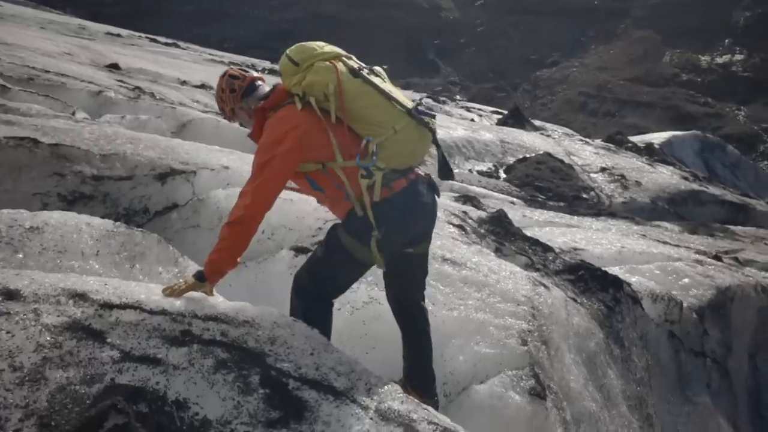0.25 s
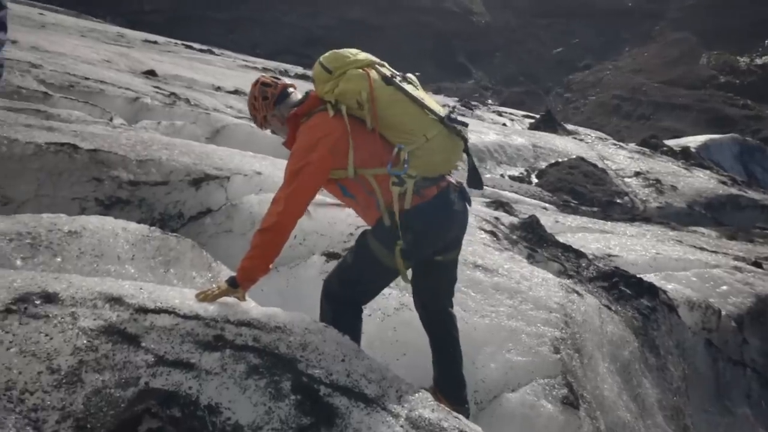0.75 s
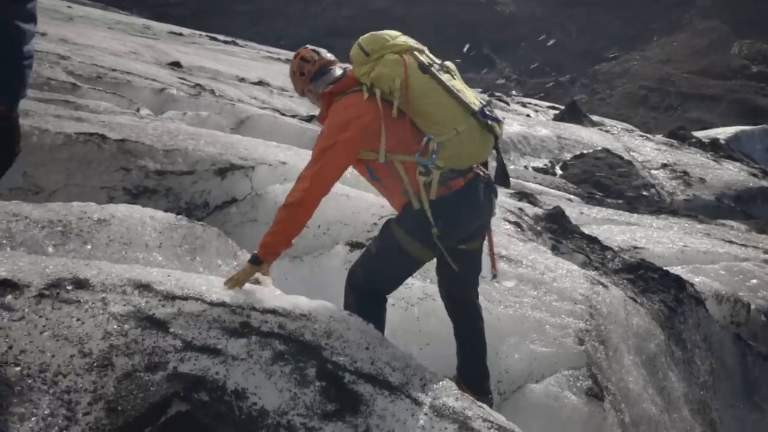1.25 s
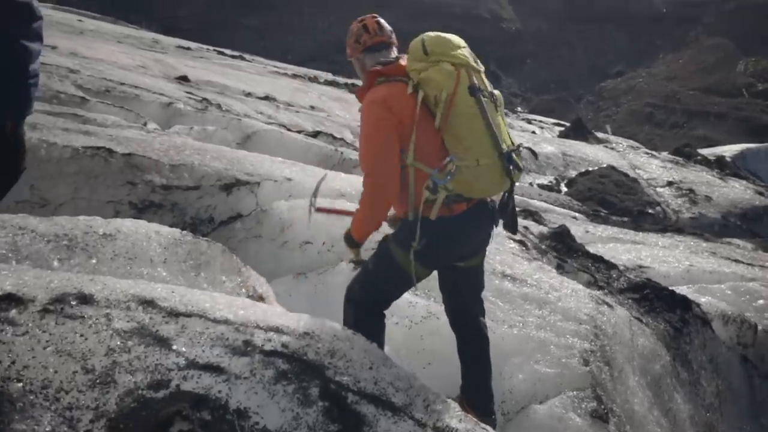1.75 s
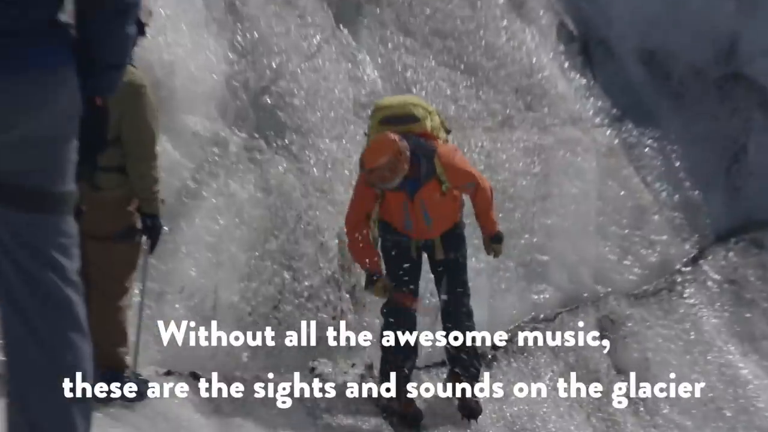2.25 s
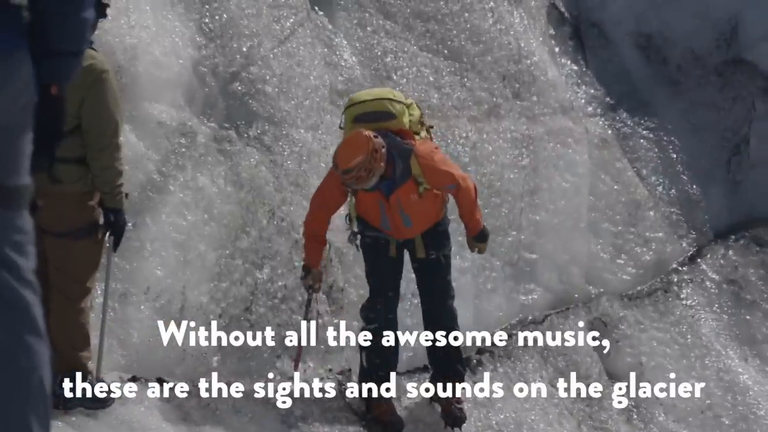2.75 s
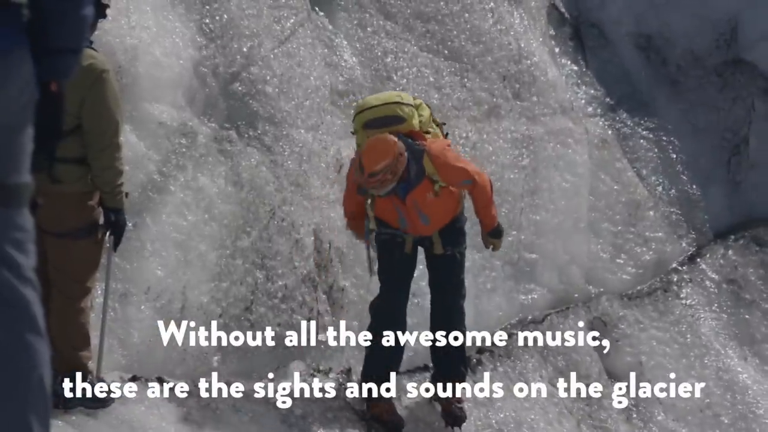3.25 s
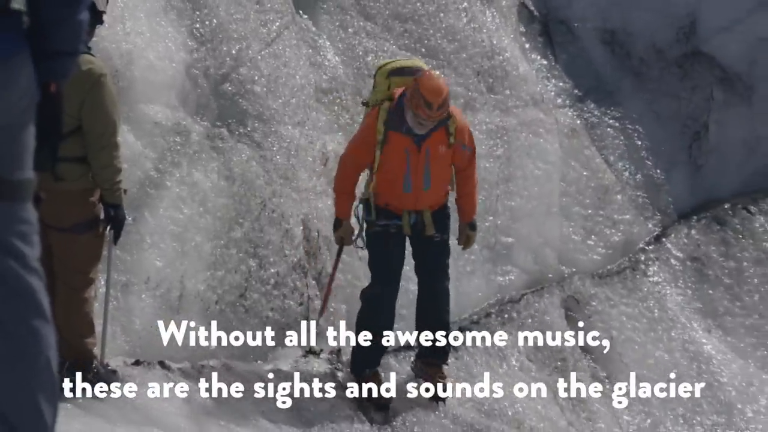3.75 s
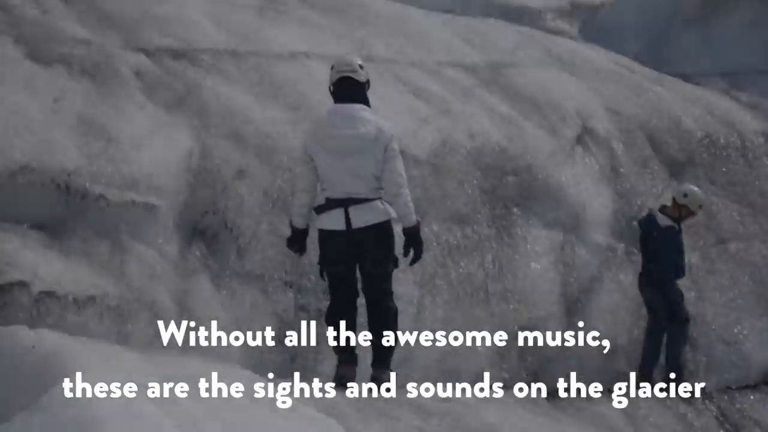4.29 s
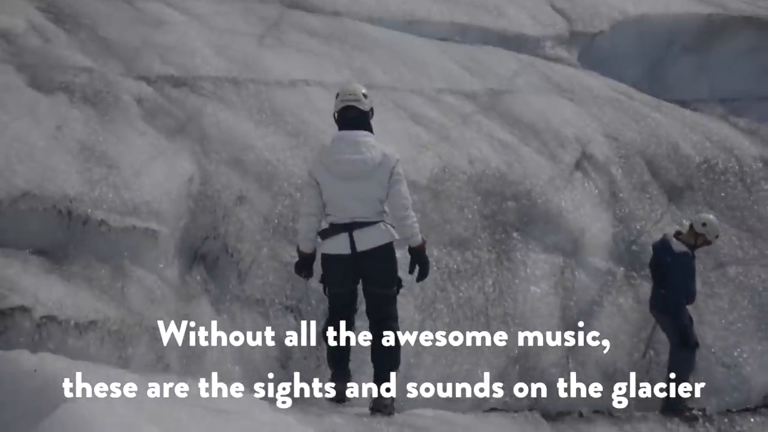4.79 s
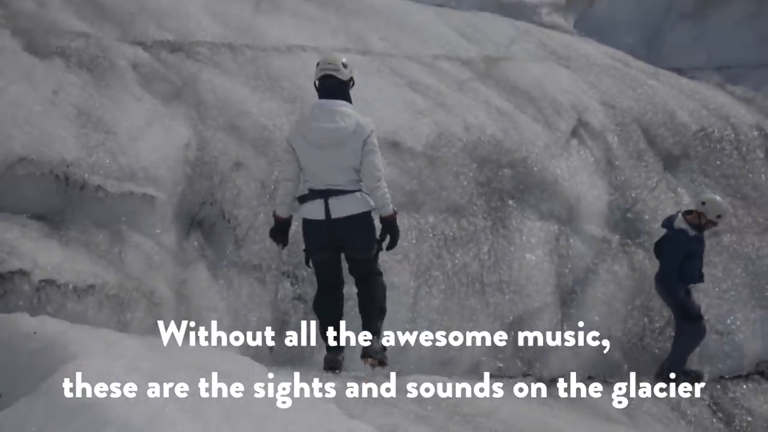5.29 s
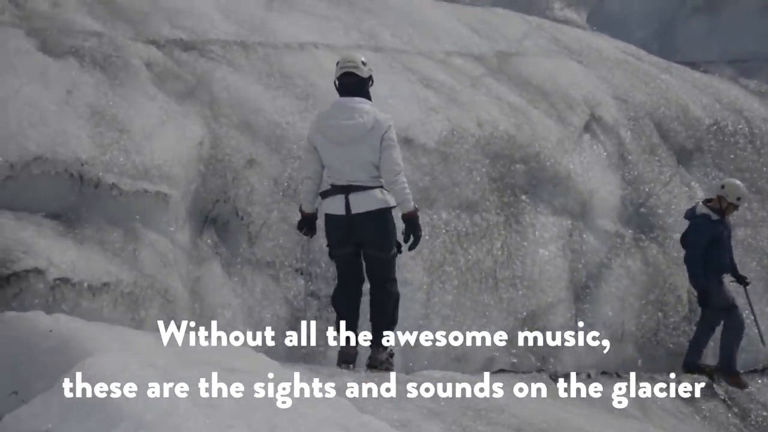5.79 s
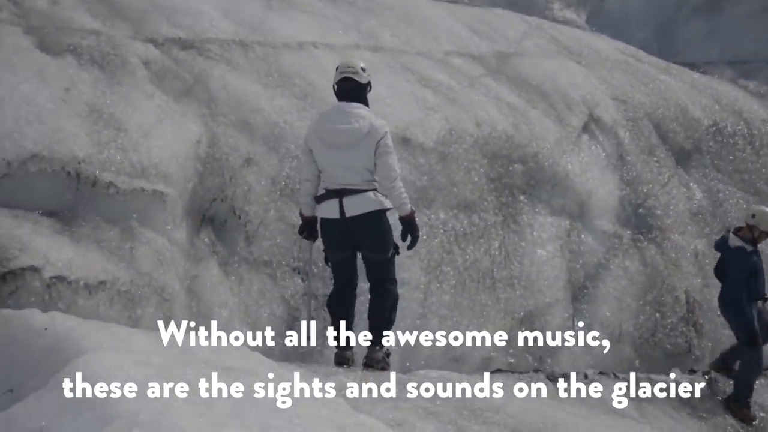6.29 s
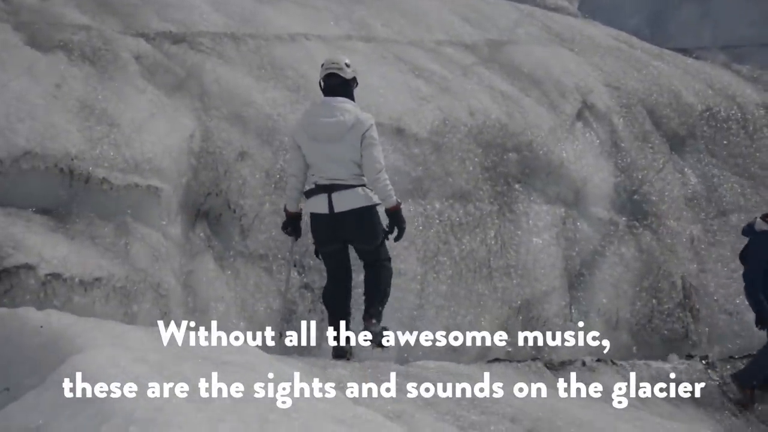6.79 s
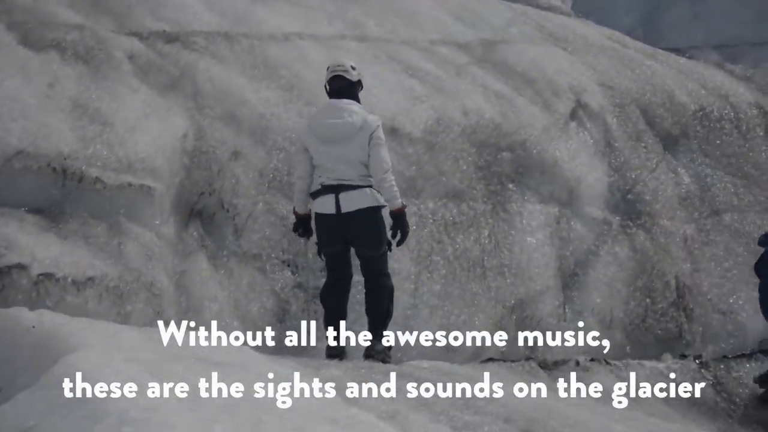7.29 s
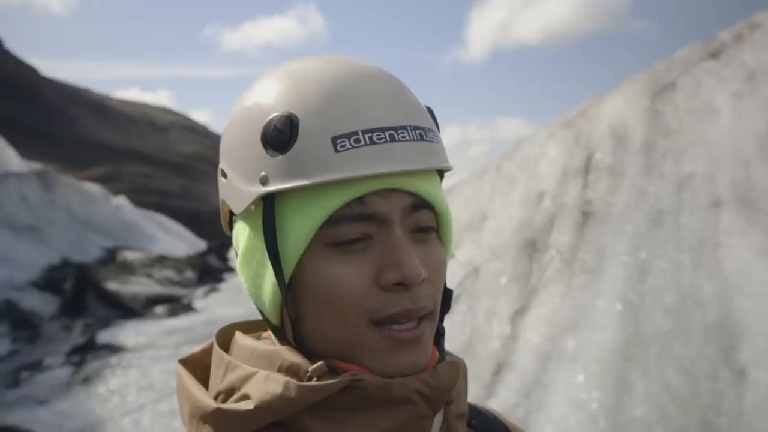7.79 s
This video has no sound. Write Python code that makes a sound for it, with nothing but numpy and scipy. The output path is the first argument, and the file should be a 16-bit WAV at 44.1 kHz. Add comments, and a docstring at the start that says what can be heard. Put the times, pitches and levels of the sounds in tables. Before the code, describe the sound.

Five crisp ice axe blows come first, the middle ones strongest, each cracking and chattering with short ringing and a sprinkle of ice. Then five softer, duller blows follow at an even pace, mixed with many short gritty crampon steps. Throughout, gusts thump an exposed microphone over a low roar, airy rush and faint gritty hiss. The place is open and dry, without echo.

```python
"""An ice axe bites into glacier ice: cracking ice, knock, pick chatter, ringing steel modes, falling spray.
From four seconds on the blows are muffled, as if farther off. Crampon steps crunch as bursts of fractures.
Bits of ice tick as short resonant noise; a few dry clicks are bare decaying pulses.
Behind them gusty wind buffets the microphone in a low rumble and a sliding roar of filtered noise,
over a rush of air and a hiss with gritty ice grains."""
import sys
import numpy as np
from scipy import signal
from scipy.fft import rfft, irfft, next_fast_len
from scipy.io import wavfile
from scipy.ndimage import uniform_filter1d

SR = 44100
rng = np.random.default_rng(int(sys.argv[2]) if len(sys.argv) > 2 else 0)


def put_to_file(sound):
    """Save the sound as 16-bit audio at rate SR, in the file named by the first command-line argument."""
    columns = np.atleast_2d(sound).T  # one column per channel
    safe = np.clip(columns, -1, 1)
    whole_steps = np.round(safe * 32767)
    wavfile.write(sys.argv[1], SR, whole_steps.astype(np.int16))


N = 354652


def from_db(db):
    """Decibels to amplitude gain."""
    return 10 ** (np.asarray(db) / 20)


def rms_one(x):
    """Scale to an rms of one."""
    return x / np.sqrt(np.mean(x ** 2) + 1e-20)


def in_time(rows):
    """Each column of a time curve, interpolated at every sample."""
    time_s, *columns = np.transpose(rows)
    return [np.interp(np.arange(N) / SR, time_s, column) for column in columns]


def add(track, start_s, sound):
    """Mix a sound into the track."""
    start = max(0, round(start_s * SR))
    track[start:start + len(sound)] += sound[:max(0, N - start)]


def coloured(x, spectrum):
    """Causal minimum-phase filter with the given spectrum shape; white noise keeps its level."""
    size = 2 * next_fast_len(len(x) // 2 + SR // 10)
    hz, db = np.transpose(spectrum)
    grid_hz = np.maximum(np.fft.rfftfreq(size, 1 / SR), 1)
    beyond = np.minimum(grid_hz / hz[0], 1) * np.minimum(hz[-1] / grid_hz, 1)
    shape_db = np.interp(np.log(grid_hz), np.log(hz), db)
    gain = rms_one(from_db(shape_db) * beyond ** 2)
    # folded cepstrum gives the minimum phase
    cepstrum = irfft(np.log(gain))[:size // 2]
    cepstrum[1:] *= 2
    response = np.exp(rfft(cepstrum, size))
    return irfft(rfft(x, size) * response, size)[:len(x)]


def resonance(x, hz, width_hz):
    """Two-pole resonance with gain one on top."""
    r = np.exp(-np.pi * width_hz / SR)
    numerator = np.array([1, 0, -1]) * (1 - r * r) / 2
    denominator = [1, -2 * r * np.cos(2 * np.pi * hz / SR), r * r]
    return signal.lfilter(numerator, denominator, x)


def low_pass(x, hz, order):
    """Butterworth low-pass, cutoff held below Nyquist."""
    return signal.sosfilt(signal.butter(order, min(hz, SR / 2 - 100), fs=SR, output="sos"), x)


def drift(rate_hz):
    """Smooth random curve with an rms of one: noise low-passed at rate_hz."""
    return rms_one(low_pass(rng.standard_normal(N + SR), rate_hz, order=2)[SR:])


def evened(x, span_s):
    """Noise brought to an rms near one, steady over spans longer than span_s."""
    power = uniform_filter1d(x ** 2, max(2, int(span_s * SR)))
    return x / np.sqrt(power + 1e-12)


def fractures(per_s, spread_db):
    """Tiny breaks at random moments, of uneven size and either sign; rms one."""
    size_db = spread_db * np.clip(rng.standard_normal(N), -2, 2)
    sizes = from_db(size_db) * rng.choice([-1, 1], N)
    return rms_one(sizes * (rng.random(N) < per_s / SR))


def load(t, peak_s):
    """Force on the ice: rises to one at peak_s, then collapses as the ice gives way."""
    u = t / peak_s
    return u * np.exp((1 - u * u) / 2)


def grit(per_s, low_hz, high_hz, spread_db, relative_width, count=18):
    """Grains of ice land at random; each rings briefly at one of count pitches; rms one."""
    landings, dealt = fractures(per_s, spread_db), rng.integers(0, count, N)
    out = np.zeros(N)
    for k, hz in enumerate(np.geomspace(low_hz, high_hz, count)):
        grains = landings * (dealt == k) + 1e-18
        once = resonance(grains, hz, relative_width * hz)
        out += resonance(once, hz, relative_width * hz) / np.sqrt(hz)
    return rms_one(out)


# axe blows: start_s, bite_s (rise to full force), crack_db, knock_hz, knock_db, chatter_db,
#            ring_db, pitch_ratio (set by the grip of the ice on the pick), crumble_db
AXE_BLOWS = [(0.476, 0.01, -20, 1610, -23.5, -19, -43, 1.012, -34),
             (1.02, 0.0082, -20, 1370, -23.5, -25, -26, 1.01, -27.5),
             (2.028, 0.0049, -12.5, 680, -25.5, -8.5, -35, 1.005, -40),
             (2.647, 0.0055, -12.5, 1238, -18.5, -12.5, -27.5, 1.015, -23.5),
             (3.2113, 0.0061, -16.5, 538, -37, -9.5, -28, .997, -25.5),
             (4.457, 0.0034, -22, 670, -24.5, -22, -43, 1.09, -28),
             (5.139, 0.0016, -31.5, 1610, -38, -27, -39, 1.03, -29),
             (5.839, 0.0022, -34, 715, -23, -16, -48, 1.07, -26),
             (6.504, 0.0045, -32, 1660, -45, -26, -39, 1, -24),
             (7.178, 0.0042, -26, 2100, -23.5, -20.5, -34, 1, -27)]
# free ring of the steel pick: pitch_hz (before pitch_ratio), level_db (added to ring_db), t60_s
PICK_MODES = [(1675, -2, 0.1), (3740, -2, 0.31), (6370, -4, 0.072), (12800, -21, .2)]
# spectrum shape of cracking ice: freq_hz, density_db (relative, per Hz)
CRACK_SPECTRUM = [(200, -8), (500, 15), (800, 6), (1300, 8.5), (2100, 5.5), (2800, 6.5), (4000, -1),
                  (5000, -3.5), (6400, 3), (8000, -2), (11500, -3.5), (16000, -17)]
CHATTER_HZ, CHATTER_WIDTH_HZ, KNOCK_WIDTH_HZ = 3617, 170, 110
RING_WANDER_RAD = 0.65
FAR_FROM_S, NEAR_MUFFLE_HZ, FAR_MUFFLE_HZ = 4.04, 15000, 4980
SPRAY_PEAK_S, SPRAY_FALL_S, SPRAY_BELOW_CRUMBLING_DB, SPRAY_GRAINS_PER_S = 0.077, 0.03, -15, 500


def axe(crumble_t60_s=0.13, ring_rough_db=5.5, knock_stretch=1.47, treble_leak_db=-15.5,
        head_hz=2800, head_db=-18.5):
    """The pick cracks in, knocks and chatters; then crumbs trickle, the steel rings on and spray lands."""
    out, t = np.zeros(N), np.arange(SR // 2) / SR
    cracks = evened(coloured(fractures(per_s=14000, spread_db=7.5), CRACK_SPECTRUM), span_s=0.003)
    # chatter also shakes a lower resonance of the axe head
    head_noise = resonance(rng.standard_normal(N), head_hz, CHATTER_WIDTH_HZ)
    head = from_db(head_db) * evened(head_noise, span_s=0.015)
    # the seated pick rubs on the ice, which roughens its ring in level and phase
    rubbing = from_db(ring_rough_db * drift(90))
    slipping_rad = RING_WANDER_RAD * drift(58)
    spray = grit(SPRAY_GRAINS_PER_S, low_hz=1200, high_hz=9600, spread_db=6.0, relative_width=0.25)
    landing = np.minimum(t / SPRAY_PEAK_S, np.exp((SPRAY_PEAK_S - t) / SPRAY_FALL_S))
    for (start_s, bite_s, crack_db, knock_hz, knock_db, chatter_db,
         ring_db, pitch_ratio, crumble_db) in AXE_BLOWS:
        here = slice(int(start_s * SR), int(start_s * SR) + len(t))
        force = load(t, bite_s)
        seated = 1 - np.exp(-(t / bite_s / 2) ** 2)
        since_s = np.maximum(t - 2 * bite_s, 0)
        crumbling = seated * from_db(crumble_db - 60 * since_s / crumble_t60_s)

        knock = resonance(rng.standard_normal(len(t)), knock_hz, KNOCK_WIDTH_HZ)
        knock = evened(knock, span_s=0.017)
        chatter = resonance(rng.standard_normal(len(t)), pitch_ratio * CHATTER_HZ, CHATTER_WIDTH_HZ)
        chatter = evened(chatter, span_s=0.0017)

        blow = cracks[here] * (from_db(crack_db) * force + crumbling)
        blow += knock * from_db(knock_db) * load(t, knock_stretch * bite_s)
        blow += (chatter + head[here]) * (from_db(chatter_db) * force + crumbling / 2)
        blow += spray[here] * landing * from_db(crumble_db + SPRAY_BELOW_CRUMBLING_DB)
        for pitch_hz, level_db, t60_s in PICK_MODES:
            ring = seated * rubbing[here] * from_db(ring_db + level_db - 60 * since_s / t60_s)
            cycles = pitch_ratio * pitch_hz * t + rng.random()
            blow += ring * np.sin(2 * np.pi * cycles + slipping_rad[here])

        # a faint unfiltered copy keeps a trace of treble in the far blows
        muffle_hz = FAR_MUFFLE_HZ if start_s > FAR_FROM_S else NEAR_MUFFLE_HZ
        add(out, start_s, low_pass(blow, muffle_hz, order=7) + from_db(treble_leak_db) * blow)
    return out


# crampon steps: start_s, rise_s (to full weight), body_db, crisp_db (both before trim)
STEPS = [(0.709, 0.0071, -35, -54), (0.867, 0.0086, -37.5, -37), (1.186, 0.0069, -38, -37),
         (1.85, 0.018, -44, -42.5), (4.215, 0.0085, -42, -48.5), (4.286, 0.01, -33, -36),
         (4.569, 0.041, -43.5, -49), (4.925, 0.011, -36.5, -47.5), (5.266, .022, -43.5, -50),
         (5.603, 0.01, -36, -42.5), (5.76, 0.0072, -42, -59), (5.854, 0.011, -40.5, -41),
         (6.104, .008, -41, -48), (6.195, 0.017, -36.5, -38), (6.273, 0.02, -37, -48),
         (6.582, 0.013, -40, -39), (6.728, 0.0073, -33, -43), (7.049, 0.011, -33.5, -39.5),
         (7.206, 0.0092, -31, -29.5)]
# spectrum shapes of the crunch: freq_hz, density_db (relative, per Hz)
BODY_SPECTRUM = [(200, 1), (500, 9.5), (1250, 4.5), (1800, -4), (2200, 1), (2800, -27), (3600, -11),
                 (4400, -38), (9000, -42)]
CRISP_SPECTRUM = [(1500, -2), (2800, -3), (3650, 5), (4400, -7), (5600, -8.5), (6700, -5), (8500, -8),
                  (12000, -12.5), (16000, -18)]
# the front spikes bite after the heel spikes, the later the slower the step
TOE_LAG_PER_RISE, TOE_BODY_DB, TOE_CRISP_DB = 1.38, 1.5, -2.5


def crampons(body_trim_db=5.0, crisp_trim_db=4.0, lumps_db=-6.5, slip_db=3.0):
    """Heel, then toe spikes break the crust in jerks: coarse and fine fractures, knocking loose lumps."""
    body_power, crisp_power, t = np.zeros(N), np.zeros(N), np.arange(SR // 4) / SR
    for start_s, rise_s, body_db, crisp_db in STEPS:
        heel, toe = (0, 0, 0), (TOE_LAG_PER_RISE * rise_s, TOE_BODY_DB, TOE_CRISP_DB)
        for lag_s, more_body_db, more_crisp_db in (heel, toe):
            weight = load(t, rise_s)
            body_gain = from_db(body_db + more_body_db + body_trim_db)
            crisp_gain = from_db(crisp_db + more_crisp_db + crisp_trim_db)
            add(body_power, start_s + lag_s, (body_gain * weight) ** 2)
            add(crisp_power, start_s + lag_s, (crisp_gain * weight) ** 2)
    body, crisp = np.sqrt(body_power), np.sqrt(crisp_power)
    jerks = rms_one(from_db(slip_db * drift(300)))
    coarse = evened(fractures(per_s=2500, spread_db=3.5) * jerks, span_s=0.017)
    fine = evened(fractures(per_s=5200, spread_db=3.0) * jerks, span_s=0.0062)
    lumps = grit(per_s=450, low_hz=550, high_hz=2500, spread_db=4.0, relative_width=0.16)
    lumps = evened(lumps, span_s=0.04)
    crust = coloured(coarse * body, BODY_SPECTRUM) + coloured(fine * crisp, CRISP_SPECTRUM)
    return crust + from_db(lumps_db) * body * lumps


SPLINTER_OVER_CRISP_DB, SPLINTER_LAST_RISES = 10.5, 3.9
SPLINTER_HZ, SPLINTER_SPREAD_OCTAVES = 3770, 0.58


def splinters(count=2):
    """Rows (start_s, level_db, pitch_hz) of bits the steps snap off; crisper steps give louder ones."""
    rows = []
    for step_s, rise_s, _, crisp_db in STEPS:
        for when, size in rng.random((count, 2)):
            start_s = step_s + rise_s * (1 + when * (SPLINTER_LAST_RISES - 1))
            pitch_hz = SPLINTER_HZ * 2 ** (SPLINTER_SPREAD_OCTAVES * (2 * size - 1))
            rows.append((start_s, crisp_db + SPLINTER_OVER_CRISP_DB, pitch_hz))
    return rows


# larger bits of ice landing or snapping: start_s, level_db (before trim), pitch_hz
CHIPS = [(0.704, -24.5, 5950), (1.945, -14, 600), (2.097, -22.5, 3650), (2.235, -24, 2506),
         (2.382, -26, 1100), (2.384, -15.5, 520), (2.494, -27, 889), (2.495, -18, 505), (2.653, -4.5, 880),
         (2.667, -12, 575.6), (2.976, -22, 2797), (3.025, -19.5, 1190), (3.442, -18.5, 3220),
         (3.603, -18.5, 3760), (3.812, -12.5, 4728), (3.823, -21, 6050), (3.938, -19.5, 3950),
         (4.245, -20.5, 990), (4.366, -27, 1410), (4.426, -28, 2966), (4.929, -17, 2190),
         (4.939, -19.5, 2185), (5.351, -21.5, 980), (6.056, -30, 2400), (6.589, -17, 2235),
         (6.658, -17.5, 1570), (6.998, -23, 1110), (7.032, -19, 1799), (7.072, -11.5, 700),
         (7.316, -29, 1887), (7.353, -23.5, 3049), (7.531, -26, 2006)]


def chips(t60_s=0.028, relative_width=0.087, trim_db=-3.5, snap_db=-1.5, snap_t60_s=0.0098):
    """Each bit of ice gives a bright noise snap and a short gritty resonant tick."""
    out, t = np.zeros(N), np.arange(SR // 20) / SR
    for start_s, level_db, pitch_hz in CHIPS + splinters():
        grain = resonance(rng.standard_normal(len(t)), pitch_hz, relative_width * pitch_hz)
        tick = evened(grain, span_s=0.0025) * from_db(-60 * t / t60_s)
        snap = low_pass(rng.standard_normal(len(t)), 3 * pitch_hz, order=2)
        snap = snap * from_db(snap_db - 60 * t / snap_t60_s)
        add(out, start_s, from_db(level_db + trim_db) * (tick / np.abs(tick).max() + snap))
    return out


# bare, dry clicks: start_s, peak_db
CLICKS = [(1.997, -11), (4.038, -16), (7.662, -13)]


def clicks(decay_s=0.00081):
    """Single sharp clicks with no ring: one-sided exponential pulses."""
    out, t = np.zeros(N), np.arange(SR // 20) / SR
    for start_s, peak_db in CLICKS:
        add(out, start_s, from_db(peak_db) * np.exp(-t / decay_s))
    return out


# gusts that thump the microphone, and brief lulls: centre_s, half_s (to 1/e of the rise), rise_db
GUSTS = [(1.421, 0.085, 2.5), (1.851, 0.067, 10), (3.284, 0.041, -10.5), (3.932, 0.017, 4.5),
         (4.262, 0.051, 5), (4.67, 0.046, -4), (4.753, 0.03, 7.5), (4.997, 0.037, 6.5), (5.565, 0.011, 5),
         (5.958, .028, 6.5), (7.359, 0.029, 9)]


def gusts():
    """Rise of the wind in dB: each gust or lull swells and dies as a bell."""
    t = np.arange(N) / SR
    return sum(rise_db * np.exp(-((t - centre_s) / half_s) ** 2) for centre_s, half_s, rise_db in GUSTS)


# buffeting on the microphone: time_s, level_db (before gusts and trim)
BUFFET_LEVEL = [(0.0, -20.5), (0.1, -16), (0.2, -21.5), (0.33, -24), (0.5, -15.5), (0.95, -14), (1.1, -21),
                (1.45, -13), (1.72, -23), (1.98, -20), (2.06, -29), (2.6, -26), (3.6, -16.5), (4.65, -17.5),
                (5.15, -13), (5.4, -16), (6.85, -17.5), (7.25, -14), (7.6, -20.5), (7.7, -15),
                (8.04, -16.5)]
# roar of small eddies: time_s, shedding_hz, level_db (before gusts and trim)
ROAR = [(0, 361.8, -27.5), (.6, 377.9, -21.5), (1.15, 305.7, -24), (1.7, 295.1, -24.5), (1.8, 326, -23),
        (1.995, 346.2, -20), (2.02, 119.8, -27.5), (2.6, 120.6, -30.5), (3.1, 205.3, -23.5),
        (3.9, 220, -22), (4.05, 313.6, -24), (5.0, 325.7, -21.5), (5.5, 317.3, -24), (7.1, 310.8, -22.5),
        (8.04, 294.7, -25.5)]
# spectrum shapes: freq_hz, density_db (relative, per Hz); the eddies' holds at SHEDDING_HZ
BUFFET_SPECTRUM = [(12, -13.5), (25, -8), (52, 0.5), (85, -3.5), (125, -7), (175, -16.5), (250, -29),
                   (400, -55)]
EDDY_SPECTRUM = [(80, -14), (130, 0.5), (185, 4.5), (250, -0.5), (290, 0), (325, 3), (350, -4.5),
                 (380, -8.5), (500, -16.5), (700, -24.5), (1200, -39), (3000, -64.5)]
SHEDDING_HZ = 320
ROAR_FOLLOWS_GUST = 0.23  # share of a gust's dB rise


def wind(buffet_trim_db=0.15, eddy_trim_db=0.28, lumpy_db=1.5, waver=0.025, unsteady_db=1.0):
    """Big eddies shake the diaphragm; small ones roar, their whole spectrum sliding with wind speed."""
    buffet_db, = in_time(BUFFET_LEVEL)
    shedding_hz, eddy_db = in_time(ROAR)
    gust_db = gusts()
    buffet = evened(coloured(rng.standard_normal(N), BUFFET_SPECTRUM), span_s=0.095)
    buffet = buffet * from_db(unsteady_db * drift(9.4))
    # reading the turbulence faster raises its whole spectrum
    turbulence = coloured(rng.standard_normal(2 * N), EDDY_SPECTRUM)
    travelled = np.cumsum(shedding_hz / SHEDDING_HZ * (1 + waver * drift(4.02)))
    eddies = np.interp(travelled, np.arange(2 * N), turbulence)
    eddies = evened(eddies * from_db(lumpy_db * drift(24.6)), span_s=0.13)
    rumble = from_db(buffet_db + gust_db + buffet_trim_db) * buffet
    roar = from_db(eddy_db + ROAR_FOLLOWS_GUST * gust_db + eddy_trim_db) * eddies
    return rumble + roar


def snaps(per_s, spread_db, t60_s):
    """Dry snaps at random moments, each a burst of noise that dies at once; rms one."""
    decay = from_db(-60 / (t60_s * SR)) ** 2
    energy = signal.lfilter([1], [1, -decay], fractures(per_s, spread_db) ** 2 + 1e-18)
    return rms_one(np.sqrt(energy) * rng.standard_normal(N))


# open air: time_s, rush_db, hiss_db (icy; both before trim)
AIR = [(0.0, -40, -52), (0.29, -40, -54), (0.69, -36.5, -53.5), (1.16, -38.5, -50.5), (1.54, -36, -57),
       (1.88, -32.5, -54), (2.06, -42.5, -49.5), (2.62, -46.5, -51), (2.82, -44, -44.5),
       (3.87, -45.5, -45.5), (4.01, -45.5, -52), (5.04, -45.5, -69), (5.22, -44, -61), (5.4, -47.5, -57),
       (6.27, -45.5, -59.5), (7.28, -45, -53.5), (7.59, -48, -57.5), (8.04, -43, -68)]
# spectrum shapes: freq_hz, density_db (relative, per Hz)
RUSH_SPECTRUM = [(250, 9.5), (500, 5), (900, 1.5), (1350, 2.5), (2100, -3.5), (3000, -7.5), (3700, -6.5),
                 (4500, -12.5), (7000, -21), (15000, -30.5)]
HISS_SPECTRUM = [(1500, -10), (3000, 8), (3750, 13.5), (4600, -1), (5500, 1), (6700, 2.5), (9000, -0.5),
                 (11500, -1.5), (16000, -5.5)]
CRUMBS_PER_S, CRUMBS_OVER_HISS_DB = 12, -2  # relative to hiss_db


def open_air(rush_trim_db=1.0, hiss_trim_db=-0.3, grit_db=-4.0, flutter_db=2.0,
             hiss_flutter_db=3.5, grit_growth=0.37):
    """A smooth rush of air, and a hiss sprinkled with ticks of fine ice grit and a few larger crumbs."""
    rush_db, hiss_db = in_time(AIR)
    rush = coloured(rng.standard_normal(N) * from_db(flutter_db * drift(37)), RUSH_SPECTRUM)
    hiss = coloured(rng.standard_normal(N) * from_db(hiss_flutter_db * drift(90)), HISS_SPECTRUM)
    grains = grit(per_s=260, low_hz=1800, high_hz=12000, spread_db=6.0, relative_width=0.25)
    # grains stand out more where the hiss is loud
    grains = grains * from_db(grit_db + grit_growth * (hiss_db - hiss_db.max()))
    crumbs = coloured(snaps(CRUMBS_PER_S, spread_db=2.0, t60_s=0.014), CRACK_SPECTRUM)
    crumbs = from_db(CRUMBS_OVER_HISS_DB) * crumbs
    icy = from_db(hiss_trim_db) * hiss + grains + crumbs
    return from_db(rush_db + rush_trim_db) * rush + from_db(hiss_db) * icy


def scene():
    """Everything sums at one microphone in the open, without reverberation."""
    return (axe() + crampons() + chips() + clicks() + wind() + open_air())[None]


CUTOFF_HZ = 15900


def record(dry):
    """Peaks beyond full scale clip, then a steep low-pass cuts the top."""
    clipped = np.clip(dry, -1, 1)
    top_cut = signal.ellip(10, 0.1, 80, CUTOFF_HZ, fs=SR, output="sos")  # order, ripple dB, stopband dB
    return signal.sosfilt(top_cut, clipped)


dry = scene()
out = record(dry)
put_to_file(out)
```